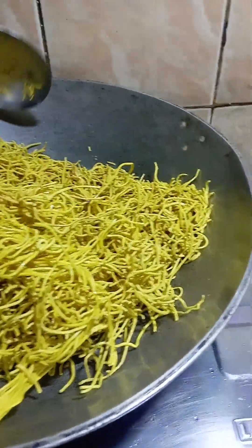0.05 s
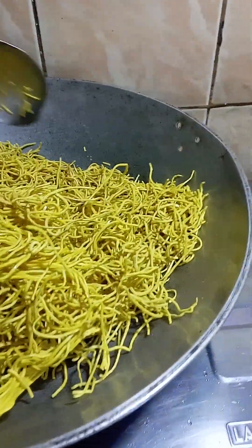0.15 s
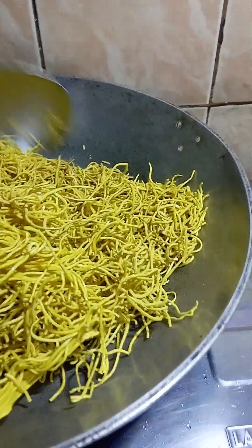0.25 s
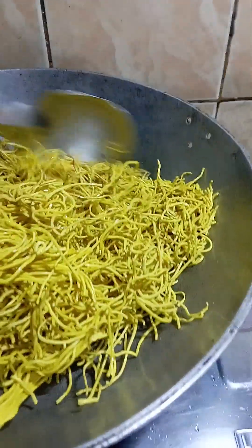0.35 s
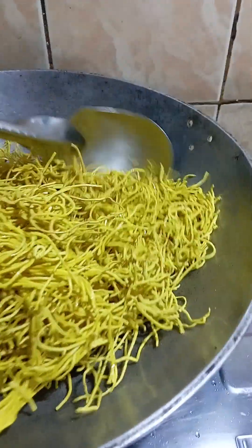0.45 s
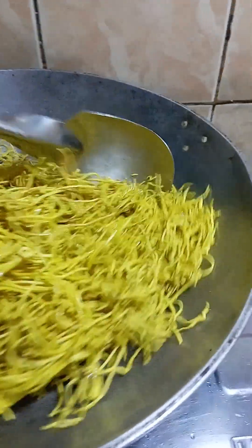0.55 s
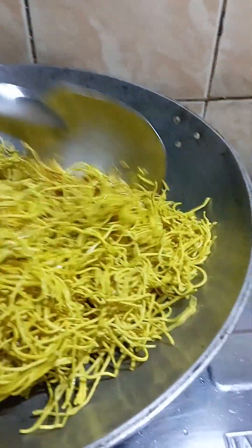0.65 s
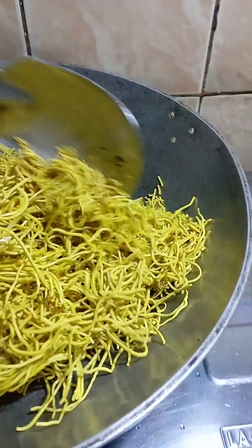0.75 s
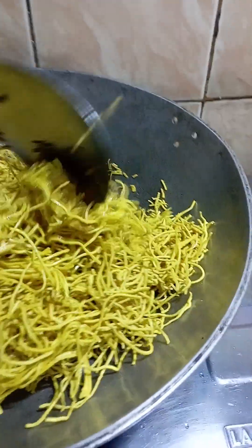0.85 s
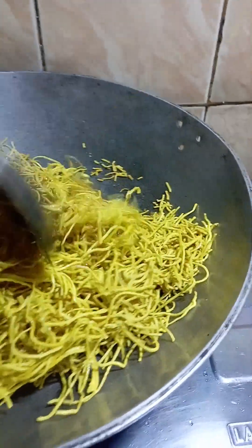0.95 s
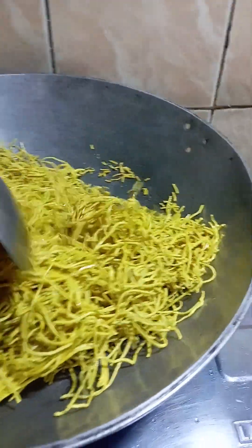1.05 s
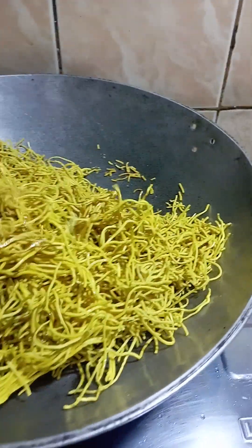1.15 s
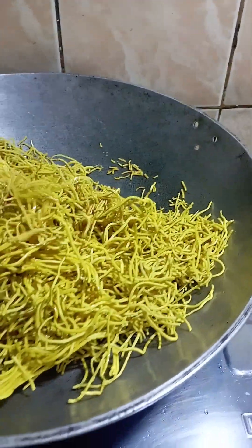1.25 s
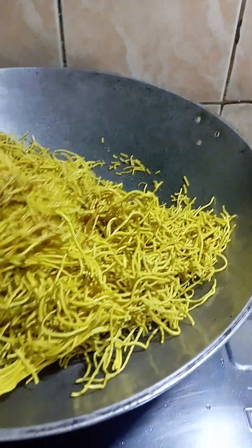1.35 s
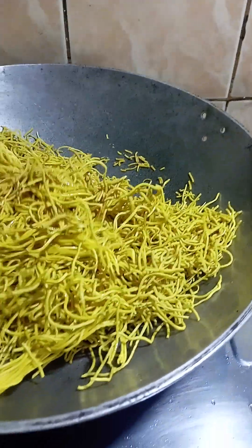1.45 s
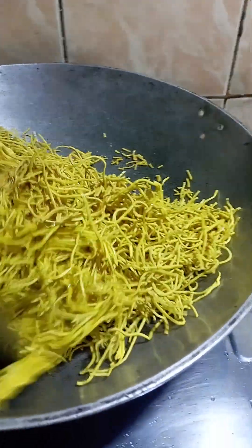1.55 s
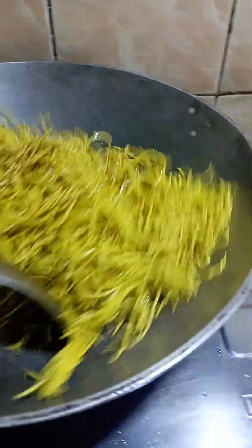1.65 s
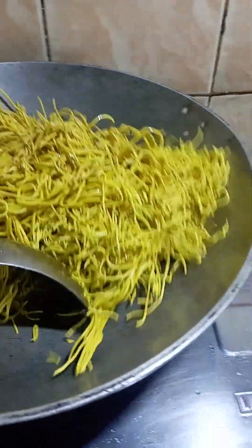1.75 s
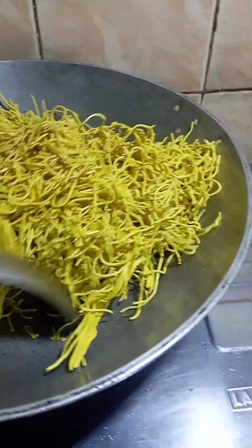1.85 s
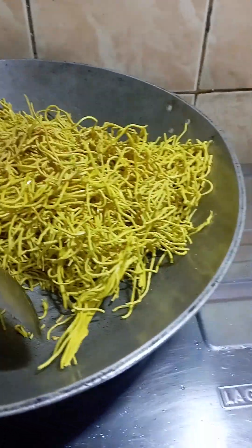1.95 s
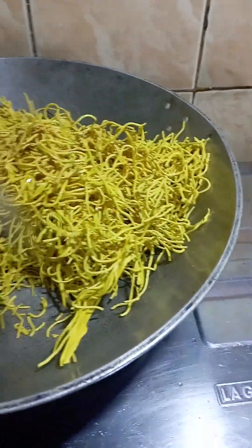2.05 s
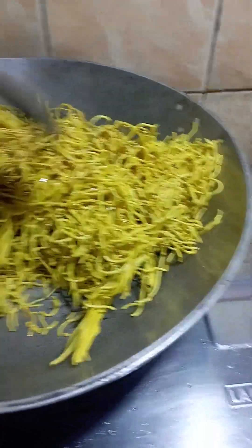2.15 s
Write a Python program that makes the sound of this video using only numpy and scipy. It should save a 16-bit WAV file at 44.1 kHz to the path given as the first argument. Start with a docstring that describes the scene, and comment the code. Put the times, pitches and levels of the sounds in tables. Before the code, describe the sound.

A metal ladle scrapes and knocks in a wok of noodles over a faint sizzle.

```python
"""Ladle in a wok of noodles

Tiled kitchen, a phone's two microphones close to the stove. A steel ladle strikes the wok, scrapes
along its wall and stirs: rough spots and taps ring the metal, its modes shifting with the place of
contact. The wok knocks and rocks on its stand; the noodles sizzle faintly over the burner's rumble."""
import sys
import numpy as np
from scipy import signal
from scipy.fft import rfft, irfft, next_fast_len
from scipy.io import wavfile
from scipy.ndimage import uniform_filter1d, map_coordinates

SR = 44100
rng = np.random.default_rng(int(sys.argv[2]) if len(sys.argv) > 2 else 0)


def file_out(sig):
    """Save sig as 16-bit WAV at sys.argv[1]."""
    # one column per channel
    cols = np.atleast_2d(sig).T
    # limit, then scale
    lim = np.clip(cols, -1, 1)
    pcm = np.round(lim * 32767).astype(np.int16)
    wavfile.write(sys.argv[1], SR, pcm)


N = 97020
TIME = np.arange(N) / SR


def amp(db):
    return 10 ** (np.asarray(db) / 20)


def unit(x):
    return x / np.sqrt(np.mean(x ** 2) + 1e-20)


def along(points, hz):
    """Interpolate (f/Hz, value) points on a log axis."""
    f, values = np.transpose(points)
    return np.interp(np.log(hz + 1), np.log(f + 1), values)


def curves(rows):
    """One value per sample for each column after the time."""
    times, *columns = np.transpose(rows)
    return [np.interp(TIME, times, column) for column in columns]


def wobble(rate):
    """A smooth random curve, rate knots a second."""
    return map_coordinates(rng.standard_normal(int(N * rate / SR) + 4), [TIME * rate])


def filtered(x, response):
    """Pass x through a complex response of frequency."""
    size = next_fast_len(N + SR // 2)
    return irfft(rfft(x, size) * response(np.fft.rfftfreq(size, 1 / SR)), size)[..., :N]


def noise(spectrum):
    """Two unrelated noises of one colour."""
    skirted = [(spectrum[0][0] / 2, -80), *spectrum, (spectrum[-1][0] * 2, -80)]
    return unit(filtered(rng.standard_normal((2, N)), lambda hz: amp(along(skirted, hz))))


def patchy_noise(depth_db, size):
    """Two noises whose colour flickers; a larger size gives longer, narrower patches."""
    frames = signal.stft(rng.standard_normal((2, N)), nperseg=size)[2]
    patches = uniform_filter1d(rng.standard_normal(frames.shape[-2:]), size=3, axis=0)
    patches = unit(uniform_filter1d(patches, size=4, axis=1))
    return unit(signal.istft(frames * amp(depth_db * patches), nperseg=size)[1][..., :N])


def bursts(rows, rise_s):
    """Envelope of blows given as t/s, level/dB, t60/s."""
    envelope = np.zeros(N)
    for start, db, t60 in rows:
        age = np.maximum(TIME - start, 0)
        envelope += amp(db - 60 * age / t60) * (1 - np.exp(-age / rise_s))
    return envelope


# Room tone at the stove: f/Hz, relative level/dB
BURNER_SPECTRUM = [(15, -42), (25, -10), (124, -2.5), (175, -26.5), (278, -6.5), (636, -20), (936, -28.5),
                   (1250, -24), (2500, -34.5), (3250, -76), (5500, -120)]
def burner():
    """Burner and room rumble steadily in the background."""
    return amp(-55) * noise(BURNER_SPECTRUM)


# Hiss from the pan: f/Hz, relative level/dB
SIZZLE_SPECTRUM = [(1180, -45), (2000, -19), (2460, -19.5), (3010, -19.5), (6820, -16), (10100, -3.5),
                   (16000, -14)]
def sizzle():
    """Frying noodles give a faint, fine hiss."""
    return amp(-47.5) * noise(SIZZLE_SPECTRUM)


MOVES_S = (0.47, 1.4)  # the contact moves on to its second and third place
def wok(force, modes, bed, bed_db, patchy_db=2, patch_size=128):
    """A force envelope rings the wall's clear modes, by place of contact, and a bed of dense ones."""
    def resonances(f, place):
        response = 0
        for k, (hz, width, *levels_db) in enumerate(modes):
            bandpass = 1j * f * width / (hz ** 2 - f * f + 1j * f * width)
            response += (-1) ** k * amp(levels_db[place]) * bandpass ** 2
        return amp(15) * response

    contact = np.searchsorted(MOVES_S, TIME)
    wavering = force * patchy_noise(depth_db=3.5, size=512)  # modes swell and fade as the contact slides
    clear = sum(filtered(wavering * (contact == place), lambda f: resonances(f, place))
                for place in range(len(MOVES_S) + 1))
    rasp = force * patchy_noise(patchy_db, patch_size)
    return clear + filtered(rasp, lambda f: amp(bed_db) * unit(amp(along(bed, f))))


# Wok moving on its stand: t/s, hum level/dB, rumble level/dB
ROCKING = [(0, -53, -78), (.24, -59, -47.5), (.34, -55, -52), (.52, -54.5, -43.5), (.63, -62, -63),
           (.71, -46, -77), (.78, -65, -57), (1.05, -57, -73), (1.08, -44.5, -61), (1.24, -53.5, -67),
           (1.3, -75, -61), (1.6, -56, -53), (1.7, -46, -37), (1.8, -47, -42), (1.87, -78, -54),
           (1.95, -52.5, -70), (2.2, -63, -58.5)]
# Rumble of the wok's body: f/Hz, relative level/dB
BODY_BED = [(88, -50), (150, 0), (221, -3), (404, -8), (600, -29), (780, -98), (1320, -120)]
# Wok hitting its stand: t/s, force level/dB, t60/s
STAND_KNOCKS = [(.227, -20.5, 0.36), (1.636, -19, 0.17), (1.797, -21.5, 0.14), (1.82, -22.5, 0.12),
                (1.852, -27.5, 0.17), (1.875, -32.5, 0.45)]
# Low wall modes, also rung by the ladle: f/Hz, width/Hz, relative level/dB at each of three places
LOW_MODES = [(212, 41, -8, -3, -19), (250, 40, -19, -0.5, -9), (335, 62, -24, -23, -7.5),
             (515, 150, -17, -6, -8.5), (582, 30, -6, -10, -22), (721, 42, -48, -31, -11.5),
             (813, 64, -13, -18, -17.5), (989, 68, -11, -23, -23.5), (1257, 65, -10, -29, -27),
             (1353, 13, -9, -10, -30)]
# Dense modes between them: f/Hz, relative level/dB
LOW_WALL_BED = [(100, -57), (200, 4.5), (500, 11), (1000, -1), (1600, 10.5), (3000, -51)]
def stand(hum_hz=112, drift_hz=4.5):
    """The wok hums as it rocks, rumbles when pushed and knocks on the stand."""
    hum_db, rumble_db = curves(ROCKING)
    phase = 2 * np.pi * np.cumsum(hum_hz + drift_hz * wobble(15)) / SR
    hum = unit(np.sin(phase) * amp(1.1 * wobble(11.3)) * [[1], [.4]])
    rumble = wok(amp(rumble_db - 4.5), LOW_MODES[:3], BODY_BED, bed_db=0)
    knocks = wok(bursts(STAND_KNOCKS, rise_s=.001), LOW_MODES, LOW_WALL_BED, bed_db=-20.5)
    return amp(hum_db - 3.5) * hum + rumble + knocks


# Single wok modes that a blow sets ringing: t/s, f/Hz, level/dB, t60/s
STRUCK_MODES = [(0.228, 498, -30, 0.05), (0.227, 950, -28.5, 0.069), (0.226, 1367, -33.5, 0.087),
                (0.228, 2200, -34, 0.12), (0.227, 3332, -21, 0.18), (0.228, 3720, -27, 0.19),
                (0.229, 195, -27.5, 0.16), (0.233, 274.7, -27.5, 0.12), (0.44, 1856, -31, 0.1),
                (0.481, 233, -45, 0.15), (1.445, 277, -42, 0.1), (1.64, 112, -26, 0.33),
                (1.636, 800, -33.5, 0.15), (1.64, 447, -35, 0.13), (1.796, 745, -33, 0.049),
                (1.797, 485, -37.5, 0.12), (1.8, 944, -43, 0.16), (1.644, 238, -26.5, 0.16),
                (1.797, 257, -29, 0.084), (1.797, 1950, -29, 0.13), (1.835, 1950, -33, 0.29)]
def rings(rise_cycles=0.54):
    """The struck wok gives clear dying tones; low ones build up more slowly."""
    tones = sum(bursts([(start, db, t60)], rise_cycles / hz) * np.sin(2 * np.pi * hz * (TIME - start))
                for start, hz, db, t60 in STRUCK_MODES)
    return tones * [[1], [.3]]


# Ladle contacts: t/s, peak level/dB, t60/s, middle band's relative level/dB
LADLE_TAPS = [(0.2263, -7.5, 0.14, -3), (0.796, -31, 0.06, -12), (0.8713, -31.5, 0.11, -12),
              (0.9286, -27.5, 0.064, -33), (0.965, -28, 0.38, -13), (0.9947, -26, 0.098, -7),
              (1.032, -54, 0.1, -19), (1.047, -34, 0.13, -10), (1.1187, -36.5, 0.28, -5.5),
              (1.226, -34, 0.086, -10), (1.442, -26.5, 0.13, -3.5), (1.5806, -26, 0.077, -9),
              (1.627, -18.5, 0.16, -10), (1.637, -9.5, 0.11, -6), (1.964, -35, 0.18, -1),
              (2.0622, -33, 0.068, -9), (2.145, -27, 0.083, -7.5)]
def tap_force(middle_band):
    """Each tap is a brief crack over a longer ring; harder taps crack more."""
    blows = []
    for start, peak_db, t60, middle_db in LADLE_TAPS:
        ring_db = peak_db - 9.5 + (middle_db if middle_band else 0)  # rms lies under the peak
        crack_db = ring_db + 1.5 + 0.35 * peak_db
        blows += [(start, ring_db, t60), (start, crack_db, 0.015)]
    return bursts(blows, rise_s=0.0005)


# Ladle on the wall, close up: t/s, rasp level/dB, middle ring and low grind level/dB over the rasp
SCRAPE = [(.24, -33, 0.5, -17), (.3, -42.5, -0.5, 4), (.355, -32.5, 4, 7.5), (.42, -27, -8, -1.5),
          (.45, -30, -8, -4), (.49, -26.5, -7, -9.5), (.55, -36, -1, 2), (.6, -43, 0, -4.5),
          (.66, -38.5, -4, -15), (.73, -44.5, -2.5, -16), (.82, -37.5, -8.5, -37), (.855, -44, -6.5, -31),
          (.89, -40, -10, -36), (.95, -44, -5.5, -35), (1.04, -39, -16, -28), (1.1, -43.5, -7.5, -28),
          (1.16, -40, -10.5, -30), (1.26, -47, -7.5, -24), (1.4, -70, -3, -16), (1.5, -46.5, -4.5, -13),
          (1.56, -53, 1.5, -1), (1.625, -32.5, -8, -7), (1.69, -33.5, -0.5, -28), (1.78, -32, 0.5, -30),
          (1.805, -32.5, 2, -1), (1.86, -36, 0.5, -3), (1.885, -43.5, 1, -27), (1.95, -47.5, -5, 6),
          (2.1, -56.5, -2, -0.5), (2.2, -58, -8, -12.5)]
# Dense treble modes of the rasp: f/Hz, relative level/dB
RASP_BED = [(3530, -21.5), (6000, -19), (8200, -9.5), (9230, -1), (10500, 1), (13400, -9.5), (14600, -12),
            (16000, -28)]
# Middle wall modes: f/Hz, width/Hz, relative level/dB at each of three places
MIDDLE_MODES = [(1622, 41, -28, -13, -9), (1849, 150, -2.5, -12, -15.5), (1950, 130, -36, -8, -14),
                (2009, 100, -10, -7, -10.5), (2444, 93, -3, -32, -37), (2579, 41, -18, -9, -7),
                (3028, 210, -18.5, -9, -18), (3177, 42, -3.5, -4, -22), (3564, 38, -8, -9, -7.5),
                (3836, 56, 0.5, -7, -5), (4478, 290, -5, -11.5, -8.5), (6460, 54, -4, -18, -7.5)]
# Dense modes between them: f/Hz, relative level/dB
MIDDLE_WALL_BED = [(1000, -52), (1600, -6), (2600, -2), (4500, 5.5), (6500, 5), (8000, 6.5), (12000, -16)]
def ladle(spots_per_s=2530):
    """Rubbing over rough spots drives three bands of the wok wall; taps strike the upper two."""
    rasp_db, middle_db, low_db = curves([(0, -91, 0.021, 0), (.23, -61, 0, 0), *SCRAPE])
    judder = amp(0.5 * wobble(42.97))
    spots = unit((rng.random(N) < spots_per_s / SR) * amp(2 * rng.standard_normal(N)))
    friction = amp(rasp_db) * unit(judder * (1 + amp(-12.5) * spots))
    rasp_force = friction + tap_force(middle_band=False)
    middle_force = amp(middle_db) * friction + tap_force(middle_band=True)
    rasp = wok(rasp_force, [], RASP_BED, bed_db=-0.5, patchy_db=3, patch_size=384)
    ring = wok(middle_force, MIDDLE_MODES, MIDDLE_WALL_BED, bed_db=-1)
    grind = wok(amp(low_db) * friction, LOW_MODES, LOW_WALL_BED, bed_db=-18.5)
    return rasp + ring + grind


# Likeness of the sound at the two microphones: f/Hz, correlation
MIC_LIKENESS = [(25, 0.28), (80, 0.91), (250, 0.9), (500, 0.36), (2000, 0.089), (8000, 0.11), (15000, 0.1)]
# Balance at the phone: f/Hz, left over right level/dB
MIC_BALANCE = [(60, -7), (130, 1.5), (290, -2), (640, -1.5), (1410, -1), (3100, 2), (6820, -1.0),
               (15000, 4)]
def scene(left_lead_s=0.0001865):
    """Two sound paths from the stove mix as mid and side into the close pair of microphones."""
    def width(hz):
        angle = np.arccos(np.clip(along(MIC_LIKENESS, hz), -1, 1)) / 2
        return np.array([np.cos(angle), np.sin(angle)])

    def bearing(hz):
        sign = np.array([[1], [-1]])
        return amp(sign * along(MIC_BALANCE, hz) / 2) * np.exp(1j * sign * np.pi * hz * left_lead_s)

    mid, side = filtered(ladle() + stand() + rings() + burner() + sizzle(), width)
    return filtered(np.array([mid + side, mid - side]), bearing)


def record(dry):
    """The phone rolls off the deep bass and keeps nothing above its band limit."""
    bass_cut_hz, top_hz = 60, 16100
    return filtered(dry, lambda hz: (hz < top_hz) * (1j * hz / (bass_cut_hz + 1j * hz)) ** 3)


dry = scene()
out = record(dry)
file_out(out)
```